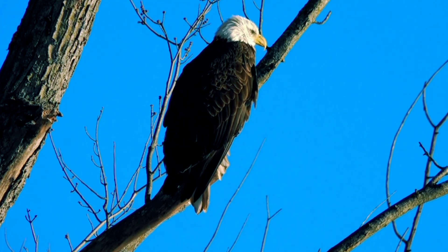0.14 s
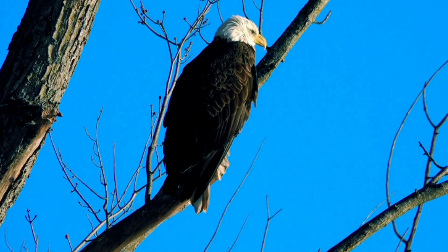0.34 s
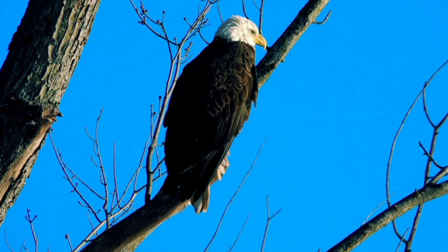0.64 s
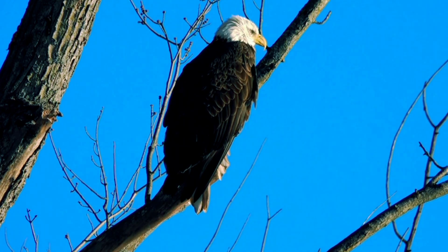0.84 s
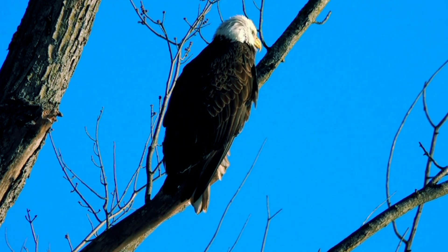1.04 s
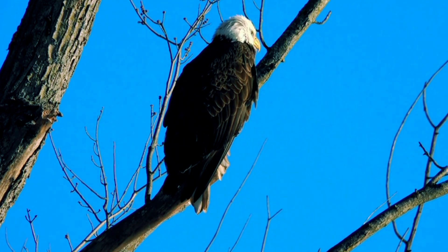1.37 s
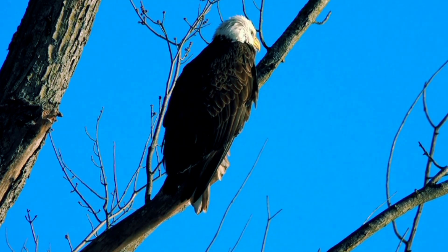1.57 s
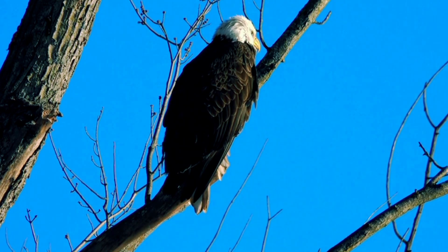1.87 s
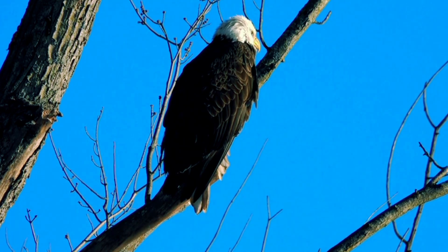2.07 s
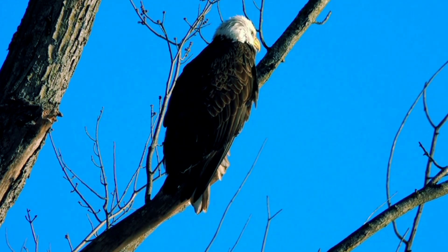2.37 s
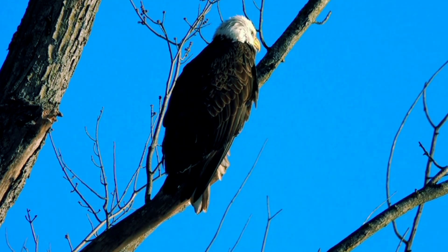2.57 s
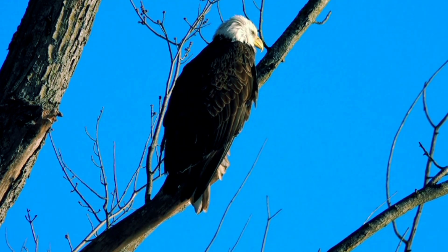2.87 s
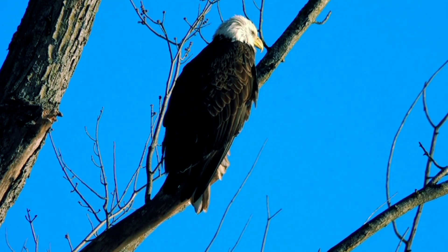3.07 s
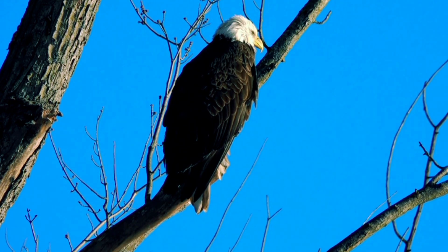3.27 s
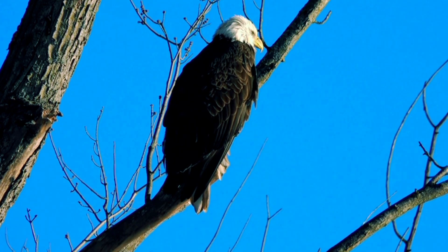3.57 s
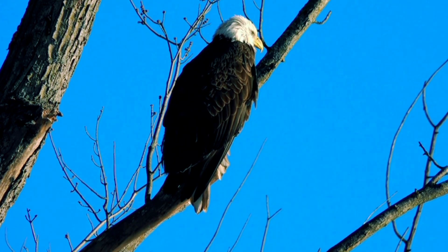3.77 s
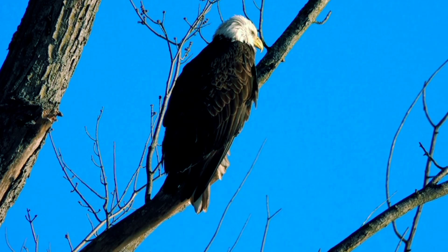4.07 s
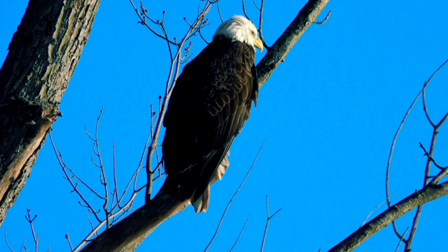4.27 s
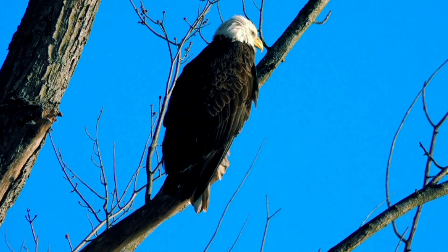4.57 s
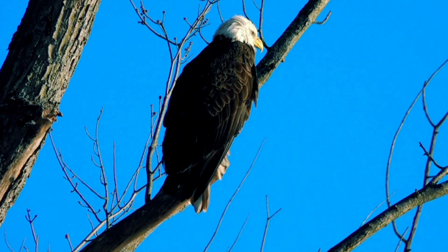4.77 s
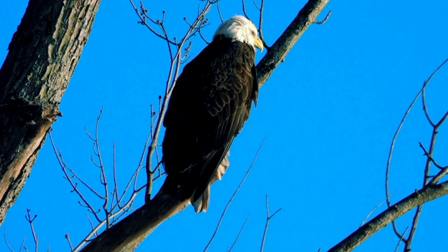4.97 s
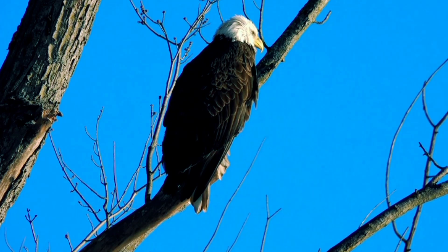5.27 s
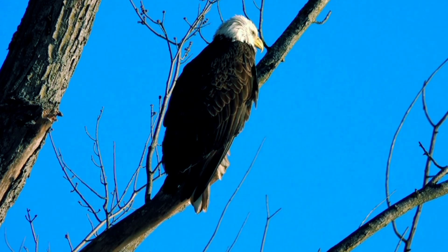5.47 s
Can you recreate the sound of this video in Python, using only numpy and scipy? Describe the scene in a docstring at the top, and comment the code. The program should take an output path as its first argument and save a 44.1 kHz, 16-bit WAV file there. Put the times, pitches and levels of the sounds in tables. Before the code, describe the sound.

The loud, distorted end of a large raptor's buzzing cry opens close up, slowing and stopping within half a second with a brief tree echo. A songbird then whistles faint rising notes, brighter arched and hooked chirps, six short trills and slow piping notes, leaning right. An insect ticks steadily, far birds whistle, and airy hiss continues; a faint low bump touches the right microphone late.

```python
"""A large bird ends a harsh buzzing cry, snaps ringing its throat, so strong that its peaks are cut flat.
From about 0.3 s an insect ticks in rough falling chirps and far birds whistle, as fluttering echoed sines.
From 0.8 s a songbird on the right whistles rising, arching, hooked, trilled and piped syllables among
trees, each stroke a sine on a drawn pitch path. At 4.5 s a low wobble bumps mainly the right microphone,
and at 4.8 s a faint low tone sinks far away. Shaped noise hisses as the air throughout."""
import sys
import numpy as np
from scipy import signal
from scipy.fft import rfft, irfft
from scipy.io import wavfile
from scipy.ndimage import uniform_filter1d

SR = 44100
rng = np.random.default_rng(int(sys.argv[2]) if len(sys.argv) > 2 else 0)


def generate_wav(signal):
    """Clip the signal to [-1, 1] and save it as 16-bit WAV at the path in sys.argv[1]."""
    frames = np.transpose(np.atleast_2d(signal))
    scaled = np.clip(frames, -1, 1) * 32767
    pcm = np.round(scaled).astype(np.int16)
    wavfile.write(sys.argv[1], SR, pcm)


N = 248371

# Slowing buzz of the cry: time_s, rate_snaps_per_s
CRY_RATE = [(0, 184.7), (.05, 183.2), (.1, 178.1), (.15, 174.4), (.2, 172.3), (.25, 169.1), (.3, 162.1),
            (.35, 150.2), (.412, 133.)]
# Throat and beak modes of the big bird: open_hz, closed_hz, width_hz (before THROAT_DAMPING)
THROAT_MODES = [(739, 590, 82), (1670, 1800, 194), (2928, 2904, 141), (3103, 3218, 247), (3640, 3497, 170),
                (4223, 4090, 190), (4810, 13000, 500)]
# Relative strength of those modes, ahead of the beak filter: open_db, closed_db
THROAT_LEVELS = [(10, 13.5), (9, -20.5), (1, -4), (3, 9.5), (-5, -6), (-4.5, -20), (-48, -26.5)]
EFFORT_DB, TIRE_DB = -3, -6  # effort at the start, its slow loss
LAST_DB, LAST_S = -1.5, 0.06  # extra drop in the last moment
SHUT_START, SHUT_END, SHUT_S = 0.11, 0.62, 0.25  # the beak closes (0-1) over SHUT_S
THROAT_DAMPING, SNAP_RISE_S, BREATH_DB = 0.76, 0.00027, -33

# Syllable shapes, one list a whistled stroke: from_start_s, pitch_hz, relative_level_db
RISE_SHAPE = [
    [(0, 5120, -13), (.012, 5205, -1), (.035, 6180, -4.5), (.055, 7000, -8.5), (.075, 7610, -12.5)],
]
ARCH_SHAPE = [
    [(0.0, 6760, -20), (0.007, 5910, -7.5), (0.013, 4860, -11.5), (0.018, 3830, -17)],
    [(0.017, 4870, -9), (0.023, 5220, -4), (0.03, 5670, -10)],
    [(0.026, 3740, -16), (0.034, 4805, -4.5), (0.042, 5230, -0.5), (0.05, 5550, -8.5)],
    [(0.044, 3620, -18.5), (0.053, 4640, -3), (0.06, 5125, -1), (0.069, 5205, -1), (0.079, 5060, -4),
     (0.089, 4420, -18)],
]
HOOK_SHAPE = [
    [(0.0, 3120, -27), (0.004, 5530, -11), (0.0065, 6230, -10.5), (0.009, 6370, -4)],
    [(0.007, 3540, -17), (0.011, 5640, -5.5), (0.014, 6200, -7), (0.017, 6300, -8)],
    [(0.019, 5120, -7.5), (0.024, 5074, -4), (0.03, 5300, -5.5), (0.033, 4690, -4.5), (0.036, 3270, -13),
     (0.039, 3790, -10.5), (0.0415, 4330, -12), (0.047, 2700, -13.5)],
    [(0.054, 2285, -32), (0.061, 2930, -20.5), (0.066, 3440, -25), (0.07, 2320, -21)],
]
# When each shape is sung: start_s, level_db (added to the shape), time_stretch, pitch_factor
RISE_TIMES = [(.829, -34.5, 0.85, 0.97), (.997, -33, 1.0, 0.96), (1.171, -32.5, 0.95, 0.96),
              (1.351, -33, 1.02, 0.97)]
ARCH_TIMES = [(1.964, -25.5, 0.91, 0.98), (2.099, -19, 0.99, 1), (2.234, -13.5, 1.0, 0.995),
              (2.366, -11.5, .97, 1.008)]
HOOK_TIMES = [(2.488, -10.5, 1.1, 1.015), (2.594, -12.5, 1.1, 1.002), (2.705, -15.5, 1.0, 0.992),
              (2.812, -15, 1.056, 0.97)]
TRILL_TIMES = [(2.927, -18.5, 0.97, 0.99), (3.116, -16, 1.0, 1.0), (3.312, -15.5, 1.0, 1.0),
               (3.506, -16, 1.0, 0.99), (3.703, -15.5, 1.0, 1.0), (3.903, -14.5, 1.0, 1.0)]
# Strokes of the trill, a lead-in, a repeated flick, a closing fall: from_start_s, pitch_hz, relative_level_db
TRILL_LEAD_IN = [(0.0, 3860, -42), (0.005, 5040, -15), (0.01, 5900, -14), (0.017, 5460, -13)]
TRILL_FLICK = [(0, 4910, -15), (.004, 5740, -6), (.008, 6060, -2.5), (.014, 5870, 1.5), (.023, 5470, -6.5)]
TRILL_CLOSE = [(.101, 4400, -22), (.106, 3880, -16), (.116, 3400, -12), (.129, 2700, -18),
               (.142, 2220, -29)]
# One value a flick, added to its shape: level_db
FLICK_LEVELS = [-2.5, -2.2, -3, -7]
FLICK_FIRST_S, FLICK_EVERY_S, FLICK_STEP_HZ = .016, .020, 56.9
# Long piped notes: start_s, length_s, loudest_after_s, crest_level_db, base_pitch_hz, drop_lands_after_s
PIPE_NOTES = [(4.12, 0.17, 0.094, -16.5, 5228, 0.07), (4.364, 0.22, 0.13, -15, 5258, 0.052),
              (4.656, 0.22, 0.13, -14.5, 5218, 0.041), (4.936, 0.22, 0.14, -13, 5174, .05),
              (5.219, 0.25, 0.13, -13, 5161, 0.046), (5.541, 0.6, 0.1, -13, 5150, 0.079)]
PIPE_DROP_HZ, PIPE_BEND, PIPE_SAG_HZ_PER_S = 471.3, 1.5, 1254
PIPE_KINK_HZ, PIPE_KINK_S, PIPE_WAVER_HZ = 30, 0.011, 14  # small rebound where the drop lands; slow waver
PIPE_START_DB, PIPE_END_DB, PIPE_RISE_POWER, PIPE_FALL_POWER = -28.5, -23.5, 3.22, 2.4
# Faint first arch syllable, and a faint downstroke leading into the first hook:
# start_s, length_s, start_pitch_hz, middle_pitch_hz, end_pitch_hz, middle_level_db
FAINT_STROKES = [(1.846, 0.013, 4570, 5030, 5560, -37), (1.859, .017, 4360, 5070, 5760, -34),
                 (1.876, 0.024, 4330, 4930, 5100, -34), (2.472, 0.022, 7000, 5930, 5200, -31.5)]
GLIDE_EDGE_DB = -4
# The songbird turns its head: time_s, left_minus_right_db
SONG_PAN_PATH = [(.8, -1), (1.799, -12), (2.349, -7), (2.7, -8.5), (3.97, -9.5), (4.14, -6.5), (5.6, -6)]

# The insect's evenly spaced runs, slowing a little overall: first_s, last_s, ticks
TICK_RUNS = [(.3165, .3765, 2), (.489, .6084, 3), (.666, 1.5573, 16), (1.621, 2.7662, 20),
             (2.8265, 3.374, 10), (3.4348, 4.1696, 13), (4.2354, 5.5884, 23)]
# Strength of the ticks over time: time_s, level_db
TICK_LEVELS = [(.3, -25), (.7, -29), (1.1, -31), (1.3, -23.5), (1.6, -27.5), (1.9, -24), (3.5, -22),
               (4.3, -23), (5.0, -24), (5.6, -21.5)]
TICK_HZ, TICK_SPREAD_HZ, TICK_SPREAD_DB, TICK_JITTER_S = 7287, 300, 0.53, 0.00071

# Single far whistles: start_s, length_s, start_pitch_hz, middle_pitch_hz, end_pitch_hz, middle_level_db
FAR_WHISTLES = [(0.316, .025, 6350, 5850, 5500, -51), (0.429, .065, 5760, 6300, 5000, -38),
                (0.68, 0.09, 7400, 7000, 8200, -48.5), (2.32, .11, 7500, 7240, 7140, -45),
                (2.335, 0.044, 2510, 2800, 3300, -61), (3.204, 0.061, 6700, 6800, 5700, -39),
                (4.33, 0.021, 3360, 3800, 3000, -51), (4.53, 0.017, 3100, 3700, 4100, -37.5),
                (4.88, 0.039, 3520, 4100, 4400, -45.5), (5.032, 0.024, 4500, 4350, 3800, -38.5),
                (5.075, .035, 3540, 3960, 4500, -41.5), (5.207, 0.059, 3900, 4000, 4400, -41),
                (5.278, .055, 4300, 3600, 3330, -43.5), (5.438, 0.022, 3080, 3200, 3120, -47),
                (5.469, .06, 3600, 4180, 4400, -38.5)]
# Two held far notes that swell and die away, one list a note: time_s, pitch_hz, level_db
HELD_NOTES = [
    [(.55, 3456, -48), (.565, 3715, -45), (.61, 3840, -41), (.635, 3817, -53), (.73, 3785, -62)],
    [(1.525, 4180, -49), (1.54, 4115, -38.5), (1.575, 4064, -39), (1.61, 4090, -30.5), (1.675, 4114, -56),
     (1.74, 4105, -53)],
]
# Shapes of the repeated far calls: from_start_s, pitch_hz, relative_level_db
SWOOP_SHAPE = [
    [(0, 6400, -5), (.025, 6470, -4.5), (.048, 6120, 0), (.07, 4800, -1.5), (.095, 3596, -2)],
]
FALL_SHAPE = [
    [(0, 3550, 6.5), (.016, 3250, -3.5), (.024, 2946, -11), (.042, 2440, -10)],
]
BUZZ_SHAPE = [
    [(0, 4240, -1), (.0115, 3066, -8.5), (.045, 2970, -16.5)],
]
# When the far calls sound: start_s, level_db (added to the shape), time_stretch, pitch_factor
SWOOP_TIMES = [(1.679, -38.5, 1.2, 1.015), (1.835, -34, 0.96, 1.01), (1.986, -34, .8, .99),
               (2.115, -34.5, 0.91, 1.03)]
FALL_TIMES = [(1.44, -57, .97, 1.01), (1.601, -51.5, 1.05, 0.95), (1.761, -50.5, 0.82, .99)]
BUZZ_TIMES = [(4.385, -35, 0.99, 1.02), (4.585, -32.5, 1.035, 1.01)]

# Dull knock on the right microphone: time_s, pitch_hz, level_db
BUMP_PATH = [(4.483, 117, -57), (4.51, 65, -39), (4.53, 56.5, -40.5), (4.565, 55.4, -41.5), (4.59, 51, -59),
             (4.63, 55, -56), (4.72, 48.7, -90)]
# Faint far tone, sinking: time_s, pitch_hz, level_db
DRONE_PATH = [(4.8, 568, -74), (4.9, 545, -81), (5.05, 522, -78), (5.2, 477, -78.5), (5.4, 423, -86)]
# Tone colour of the air: frequency_hz, relative_level_db
AIR_COLOUR = [(24, -71), (40, -31), (87, -42), (678, -28), (1470, -29.5), (2970, -14), (3720, -5.5),
              (4320, -7.5), (5150, -5.5), (5840, -6.5), (7500, -7), (9400, -11), (13300, -8.5),
              (15900, -30.5)]
# Drift of the air, added to its colour: time_s, hiss_gain_db, low_rush_gain_db
AIR_DRIFT = [(0, -54.5, -105), (.36, -53, -40), (.8, -67.5, -52), (1.7, -63, -51.5), (2.5, -55.5, -50),
             (3.9, -57, -48.5), (4.299, -60.5, -48.5), (5.2, -59, -47.5), (5.63, -57, -47.5)]
# Stereo likeness of the air: frequency_hz, left_right_likeness (-1 to 1)
AIR_LIKENESS = [(60, 0.19), (180, 0.7), (550, 0.36), (1650, 0.046), (4970, 0.19), (15000, -0.06)]
# Stereo balance of the air: frequency_hz, left_minus_right_db
AIR_LEAN = [(60, 1), (240, -6), (950, -1), (3770, -4), (15000, 2.5)]

CLIP, EDGE_HZ = 0.48, 15780  # peak ceiling (amplitude), upper band limit


def throat_ring(age, shut):
    """Damped sines of the throat modes, age seconds after a snap, with the beak shut from 0 to 1."""
    ring = 0
    for (open_hz, closed_hz, width), (open_db, closed_db) in zip(THROAT_MODES, THROAT_LEVELS):
        hz = open_hz + shut * (closed_hz - open_hz)
        level = gain_of(open_db + shut * (closed_db - open_db))
        sign = np.sign(open_hz - 2400)  # the two low modes swing against the cluster above them
        decay = np.exp(-np.pi * width * THROAT_DAMPING * age)
        ring = ring + sign * level * decay * np.sin(2 * np.pi * hz * age)
    return ring


def cry():
    """Each snap of the voice membranes rings the throat modes, which drift as the beak closes."""
    end = CRY_RATE[-1][0]
    t = np.arange(round(end * SR)) / SR
    last_moment = np.clip(1 - (end - t) / LAST_S, 0, 1)
    effort_db = EFFORT_DB + TIRE_DB * t / end + LAST_DB * last_moment

    turns = np.cumsum(np.interp(t, *np.transpose(CRY_RATE))) / SR - .47
    snaps = np.interp(np.arange(int(turns[-1]) + 1), turns, t)
    earlier = snaps[0] - np.array([2, 1]) / CRY_RATE[0][1]  # two snaps lead into the opening
    snaps = np.append(earlier, snaps)

    voice = np.zeros(N)
    for at, (uneven, late) in zip(snaps, rng.standard_normal((len(snaps), 2))):
        first = max(int(at * SR), 0)
        shut = np.interp(at, [0, SHUT_S], [SHUT_START, SHUT_END])
        jitter_s = 5e-5 * shut ** 4 * late  # time and strength grow less even as the beak closes
        age = np.maximum((first + np.arange(SR // 40)) / SR - at - jitter_s, 0)
        level_db = np.interp(at, t, effort_db) + (0.8 + 1.2 * shut ** 4) * uneven
        onset = 1 - np.exp(-age / SNAP_RISE_S)
        add(voice, first / SR, gain_of(level_db) * onset * throat_ring(age, shut))

    beak = signal.butter(3, [2550, 4600], "band", fs=SR, output="sos")
    voice = signal.sosfilt(beak, voice)  # the beak radiates the middle band best
    breath_band = signal.butter(1, [500, 5000], "band", fs=SR)
    breath = signal.lfilter(*breath_band, rng.standard_normal(len(t)))
    add(voice, 0, breath * gain_of(effort_db + BREATH_DB))
    return voice + gain_of(-24.5) * trees(voice, 1.1, .003, end_s=.135, same=1.0)


def song():
    """The songbird sings its rising notes turned away, so with more echo, and the rest toward the microphones."""
    away = sung(RISE_SHAPE, RISE_TIMES)
    toward = sung(ARCH_SHAPE, ARCH_TIMES, fade_s=.002)
    toward += sung(HOOK_SHAPE, HOOK_TIMES, fade_s=.002)
    toward += sung(trill(), TRILL_TIMES, fade_s=.002)
    for note in [pipe(*row) for row in PIPE_NOTES] + [glide(*row) for row in FAINT_STROKES]:
        add(toward, *whistle(note, flutter_db=.5, fade_s=.005))
    echo = gain_of([[-24], [-21]]) * trees(toward + gain_of(21) * away, 0.47, .004)
    pan_db = np.interp(np.arange(N) / SR, *np.transpose(SONG_PAN_PATH))
    return placed(toward + gain_of(-3.5) * away, pan_db, 1.23) + echo


def trill():
    """The strokes of one trill: each flick starts a step later and higher."""
    flicks = []
    for k, db in enumerate(FLICK_LEVELS):
        step = [FLICK_FIRST_S + k * FLICK_EVERY_S, k * FLICK_STEP_HZ, db]
        flicks.append(np.array(TRILL_FLICK) + step)
    return [TRILL_LEAD_IN, *flicks, TRILL_CLOSE]


def pipe(start, length, loudest, db, hz, settle):
    """A piped note drops toward its pitch, rebounds a little and sags, swelling to one crest."""
    age = np.linspace(0, length, num=40)
    rise = np.maximum(1 - age / loudest, 0)
    fall = np.maximum((age - loudest) / (length - loudest), 0)
    level_db = db + PIPE_START_DB * rise ** PIPE_RISE_POWER + PIPE_END_DB * fall ** PIPE_FALL_POWER
    drop = PIPE_DROP_HZ * np.maximum(1 - age / settle, 0) ** PIPE_BEND
    kink = PIPE_KINK_HZ * np.exp(-((age - settle) / PIPE_KINK_S) ** 2)
    waver = PIPE_WAVER_HZ * evened(uniform_filter1d(rng.standard_normal(len(age)), size=5))
    pitch = hz + drop - kink + waver - PIPE_SAG_HZ_PER_S * age
    return np.transpose([start + age, pitch, level_db])


def insect():
    """Ticks: a rough falling chirp in a wide spit of noise, over a faint rasp."""
    out, t = np.zeros(N), np.arange(-2600, 200) / SR
    rows = ticks()
    stop = 1 / (1 + np.exp((t - .0025) / .0005))
    for (s, db, hz), noise in zip(rows, rng.standard_normal((len(rows), 3, len(t)))):
        rough_phase = 0.14 * evened(uniform_filter1d(noise[0], 30))
        rough_level = 1 + .5 * evened(uniform_filter1d(noise[0], 12))
        chirp = np.sin(2 * np.pi * hz * (t - 40 * t ** 2) + rough_phase)
        tick = chirp * np.exp(-(t / 0.0017) ** 2) * rough_level
        spit = gain_of(-11) * np.exp(np.minimum(t, 0) / .005) * noise[1]
        rasp_noise = mode(noise[2], 7800, 2200) + gain_of(-4) * noise[2]
        rasp = gain_of(-22.5) * np.exp(t / 0.12) * rasp_noise
        add(out, s + t[0], gain_of(db) * (tick + (spit + rasp) * stop))
    out = signal.sosfilt(signal.butter(3, 5800, "high", fs=SR, output="sos"), out)
    return placed(out, -4.5, 4.42) + gain_of(-11) * trees(out, 0.051, .002)


def ticks():
    """Rows time_s, level_db, pitch_hz: even runs, each tick a little off in time, strength and pitch."""
    s = np.concatenate([np.linspace(*run) for run in TICK_RUNS])
    late, loud, sharp = rng.standard_normal((len(s), 3)).T
    level_db = np.interp(s, *np.transpose(TICK_LEVELS)) + TICK_SPREAD_DB * loud
    return np.transpose([s + TICK_JITTER_S * late, level_db, TICK_HZ + TICK_SPREAD_HZ * sharp])


def far_birds():
    """Distant whistled sines, mostly with more flutter than the near song, in a strong wash of echo."""
    birds = sung(SWOOP_SHAPE, SWOOP_TIMES, 3.1, fade_s=0.0025)
    birds += sung(FALL_SHAPE, FALL_TIMES, 1.4, fade_s=0.0055)
    birds += sung(BUZZ_SHAPE, BUZZ_TIMES, 3.0, fade_s=0.0062, warble=0.11)
    for note in [glide(*row) for row in FAR_WHISTLES] + HELD_NOTES:
        add(birds, *whistle(note, flutter_db=2.0, fade_s=0.0029))
    return placed(birds, -5, .9) + gain_of(-5) * trees(birds, .6, .005)


def bump():
    """A dull knock wobbles the right microphone as a low sine, with a weak copy on the left."""
    out = np.zeros(N)
    add(out, *whistle(BUMP_PATH, flutter_db=1.2))
    return out * gain_of([[-19], [0]])


def drone():
    """The far tone's direct sound reaches both microphones alike, wavering strongly in level."""
    out = np.zeros(N)
    add(out, *whistle(DRONE_PATH, flutter_db=9.0, fade_s=0.044))
    return out + trees(out, 0.29, 0.0056)


def air():
    """Hiss of leaves and far insects over a low rush: noise shaped by spectral frames, in drifting patches."""
    frames, hz = N // 128 + 5, np.fft.rfftfreq(512, 1 / SR)
    a, b, c, d, patches = rng.standard_normal((frames, 257, 5)).T
    patches = evened(uniform_filter1d(uniform_filter1d(patches, 8, 0), 16, 1))
    s, hiss_db, rush_db = np.transpose(AIR_DRIFT)
    t = np.arange(frames) * 128 / SR
    low = 1 / (1 + (hz[:, None] / 1800) ** 4)  # crossover from rush to hiss
    drift_db = low * np.interp(t, s, rush_db) + (1 - low) * np.interp(t, s, hiss_db)

    same = np.clip(read(AIR_LIKENESS, hz), -1, 1)[:, None]
    left = a + 1j * b
    right = same * left + np.sqrt(1 - same ** 2) * (c + 1j * d)
    lean = gain_of(read(AIR_LEAN, hz) / 2)[:, None]
    spectrum = np.array([left * lean, right / lean])
    spectrum *= gain_of(read(AIR_COLOUR, hz)[:, None] + drift_db + 3.2 * patches)
    return signal.istft(spectrum, nperseg=512, noverlap=384)[1][:, :N]


def sung(shape, times, flutter_db=2.0, **style):
    """Repeats a syllable shape, a little stretched and shifted each time."""
    bird = np.zeros(N)
    for s, level_db, stretch, pitch in times:
        for stroke in shape:
            rows = np.array(stroke) * [stretch, pitch, 1] + [s, 0, level_db]
            add(bird, *whistle(rows, flutter_db, **style))
    return bird


def glide(start, length, hz0, hz_mid, hz1, db):
    """A pitch path bent through three pitches, loudest in its middle."""
    u = np.linspace(-1, 1, num=13)
    hz = hz_mid + (hz1 - hz0) / 2 * u + ((hz0 + hz1) / 2 - hz_mid) * u ** 2
    return np.transpose([start + length * (u + 1) / 2, hz, db + GLIDE_EDGE_DB * u ** 2])


def whistle(rows, flutter_db, fade_s=0.00027, warble=0.):
    """One sine on a smoothed pitch path and a fluttering level path; warble adds a 190 Hz pitch buzz."""
    s, hz, db = np.transpose(sorted(map(tuple, rows)))
    t = np.arange(s[0], s[-1], 1 / SR)
    hz = uniform_filter1d(np.interp(t, s, hz), 60, mode="nearest")
    warble_in = np.clip((t - s[0]) / 0.013, 0, 1)
    hz *= 1 + warble * warble_in * signal.sawtooth(2 * np.pi * 190 * t, .2)
    flutter = evened(uniform_filter1d(uniform_filter1d(rng.standard_normal(len(t)), 150), 40))
    edge = np.sin(np.pi / 2 * np.clip(np.minimum(t - s[0], s[-1] - t) / fade_s, 0, 1)) ** 2
    tone = np.sin(2 * np.pi * (np.cumsum(hz) / SR + rng.random()))
    return s[0], np.sqrt(2) * tone * edge * gain_of(np.interp(t, s, db) + flutter_db * flutter)


def trees(x, t60, start_s, end_s=.5, same=0.):
    """Scattered echoes from trunks and leaves up to the edge of the stand; same sets their stereo likeness."""
    t = np.arange(SR // 2) / SR
    taps = rng.standard_normal((3, len(t))) * (rng.random((3, len(t))) < .05)
    taps = same * taps[2] + np.sqrt(1 - min(same, 1) ** 2) * taps[:2]
    taps *= gain_of(-60 * t / t60) * (t > start_s) * np.clip((end_s - t) / 0.0098, 0, 1)
    return signal.fftconvolve(x[None], taps / np.linalg.norm(taps[0]), axes=1)[:, :N]


def placed(x, left_db, lead):
    """A source between the microphones: weaker on the left, and there earlier by lead samples."""
    shift = np.exp(2j * np.pi * np.fft.rfftfreq(N) * lead)
    return np.array([gain_of(left_db) * irfft(rfft(x) * shift, N), x])


def mode(x, hz, width):
    """A ringing resonance of about unit gain at its centre."""
    pole = np.exp((2j * np.pi * hz - np.pi * width) / SR)
    return 2 * signal.lfilter([1 - abs(pole)], [1, -pole], x).real


def gain_of(db):
    """Decibels to gain."""
    return 10 ** (np.asarray(db) / 20)


def evened(x):
    """Scales to rms 1."""
    return x / np.sqrt(np.mean(x ** 2) + 1e-20)


def read(points, hz):
    """Reads a spectrum on a log-frequency axis."""
    f, value = np.transpose(points)
    return np.interp(np.log(hz + 1), np.log(f + 1), value)


def add(mix, s, sound):
    """Mixes a sound in at s seconds."""
    part = mix[max(round(s * SR), 0):][:len(sound)]
    part += sound[:len(part)]


def scene():
    """All sources at the two microphones; the wind shield thins the bass of what comes through the air."""
    heard = cry() + song() + insect() + far_birds() + drone() + air()
    return signal.sosfilt(signal.butter(3, 130, "high", fs=SR, output="sos"), heard) + bump()


def record(dry):
    """Peaks above CLIP are cut flat, mainly the cry's, which adds odd harmonics; then the band limit."""
    clipped = np.clip(dry, -CLIP, CLIP)
    band_limit = signal.firwin(511, EDGE_HZ, window=("kaiser", 9), fs=SR)
    return signal.oaconvolve(clipped, band_limit[None], "same")


dry = scene()
out = record(dry)
generate_wav(out)
```